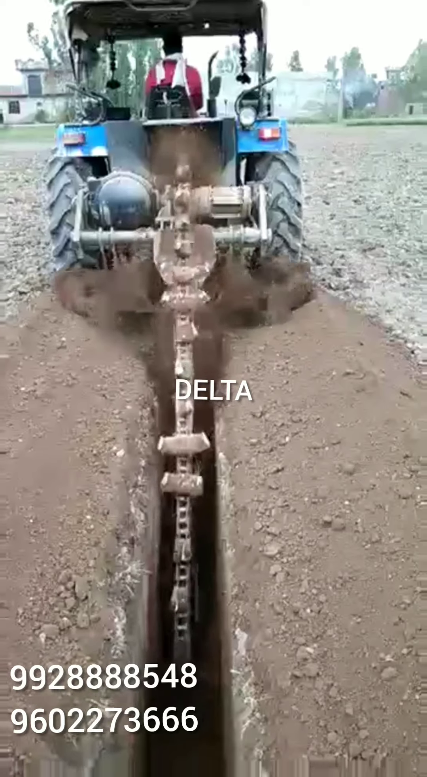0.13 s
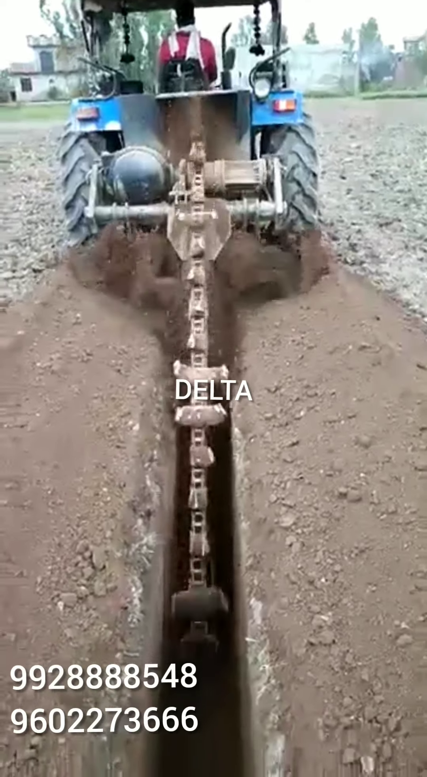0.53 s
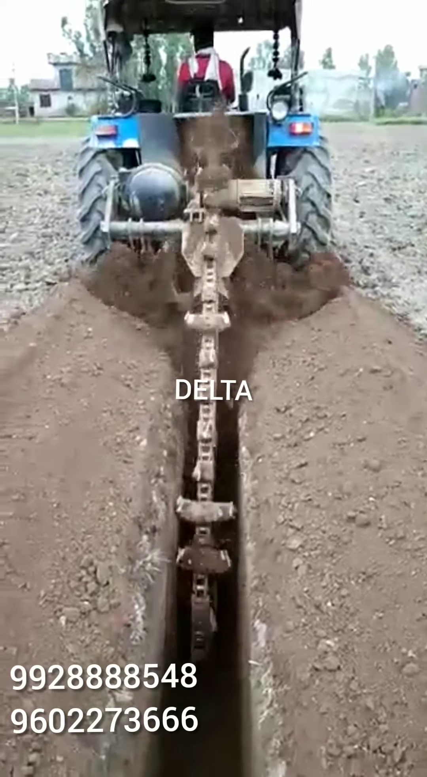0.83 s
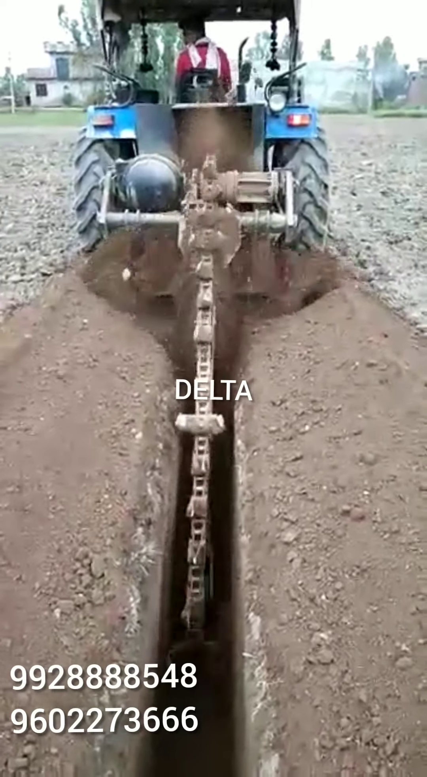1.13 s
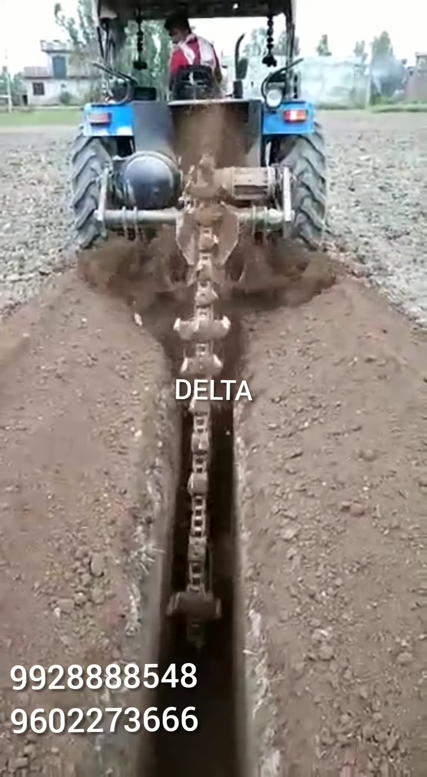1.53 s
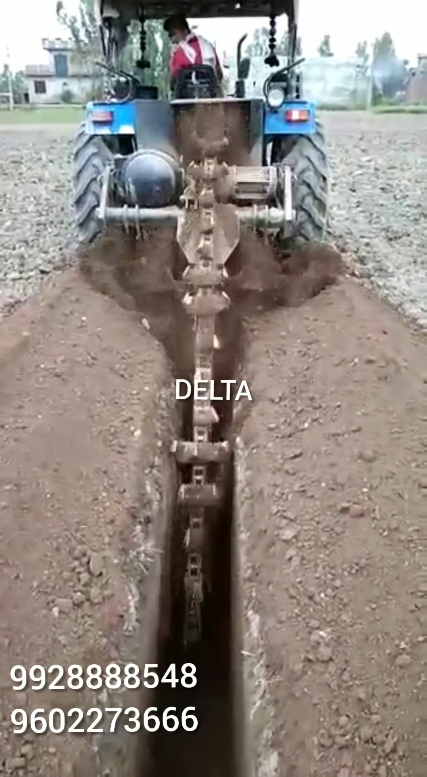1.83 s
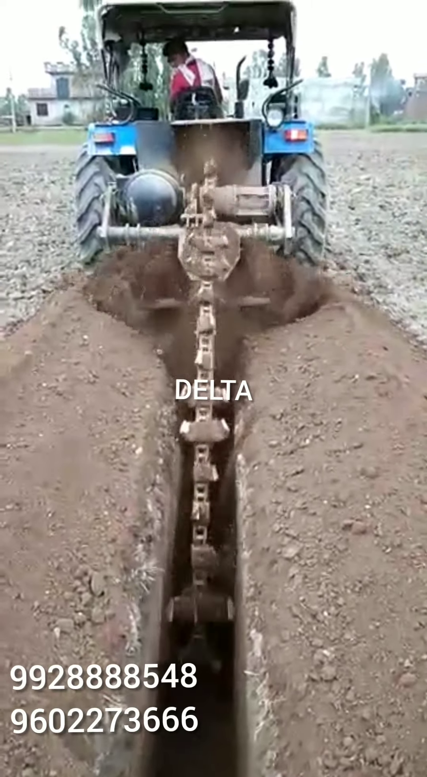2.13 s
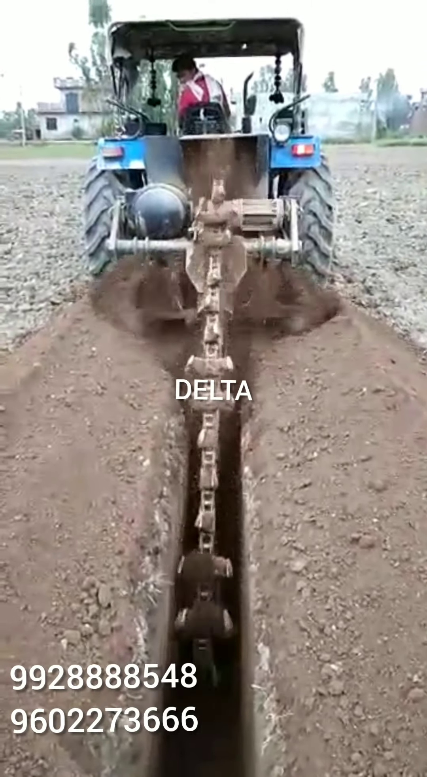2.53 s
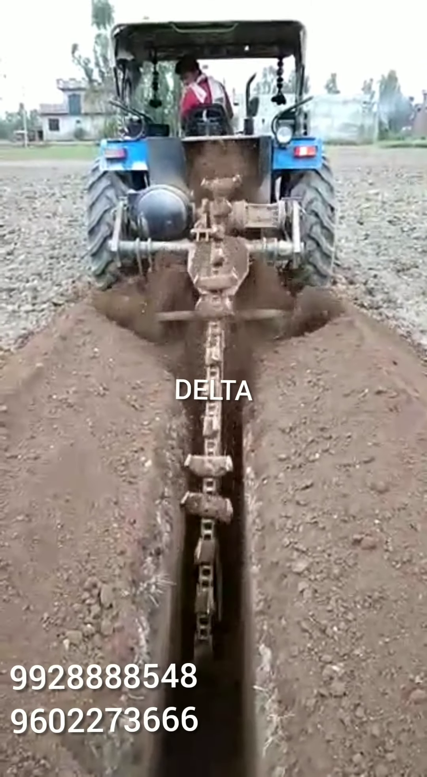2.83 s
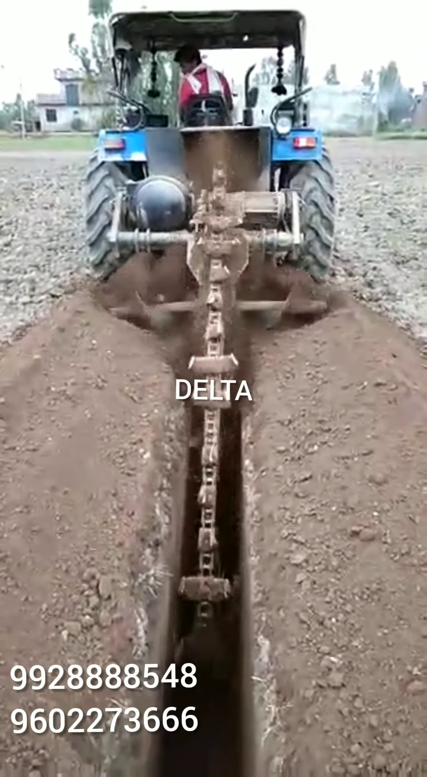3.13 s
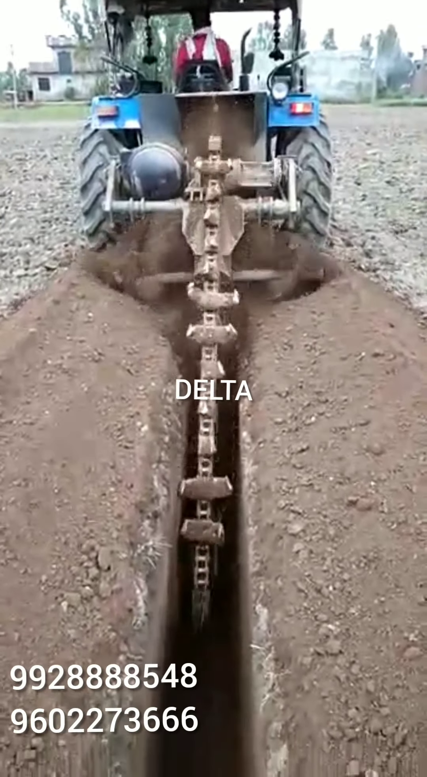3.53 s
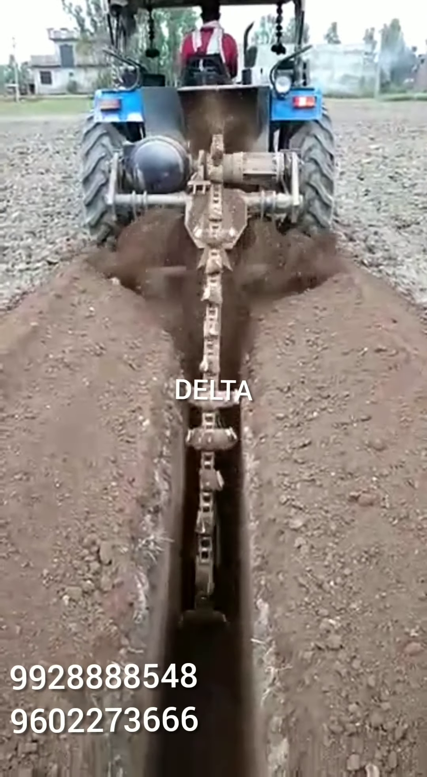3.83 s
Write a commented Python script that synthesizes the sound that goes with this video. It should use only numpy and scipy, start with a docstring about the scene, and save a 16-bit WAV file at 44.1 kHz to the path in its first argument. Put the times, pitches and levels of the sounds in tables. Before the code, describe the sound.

Chain trencher cuts in abruptly, its wavering gear drone mixed with metal chain clatter and gritty hiss.

```python
"""After 0.3 s of silence a chain trencher cuts in abruptly, a loud wavering drone over a low diesel throb.
The tractor's engine and the loaded gear drive are tuned tones, wandering in pitch and level. The chain rattles
and clatters over its sprocket and thumps along the boom: tiny random impacts through coloured filters. Dry soil
hisses as pulsed noise, stones scrape in short noise swells, links clank and jingle as decaying sine tones,
and dry pins give a few gliding squeaks."""
import sys
import numpy as np
from scipy import signal
from scipy.fft import rfft, irfft, next_fast_len
from scipy.io import wavfile
from scipy.ndimage import uniform_filter1d, minimum_filter1d, map_coordinates

SR = 44100
rng = np.random.default_rng(int(sys.argv[2]) if len(sys.argv) > 2 else 0)


def pcm_store(signal):
    """Save signal as 16-bit PCM."""
    levels = np.round(np.clip(np.atleast_2d(signal), -1, 1) * 32767)
    wavfile.write(sys.argv[1], SR, levels.astype(np.int16).T)


N = 176400  # 4 s

FIRING_HZ = 51.16  # mean firing rate of the diesel
LINK_HZ = 40.7  # links passing the sprocket
TOOTH_HZ, SPEED_SPREAD = 199.4, 0.00791  # mean gear tooth rate, relative spread of the drive's speed


def amp(db):
    """Linear gain of a level in dB."""
    return 10 ** (np.asarray(db) / 20)


def unit(x):
    """x scaled to rms 1."""
    return x / np.sqrt(np.mean(x ** 2) + 1e-20)


def clock():
    """Time of every sample in seconds."""
    return np.arange(N) / SR


def curves(rows):
    """One value per sample for each column after the time."""
    s, *cols = np.transpose(rows)
    return [np.interp(clock(), s, c) for c in cols]


def wobble(rate):
    """A smooth random curve, rate knots a second."""
    return map_coordinates(rng.standard_normal(4096), [clock() * rate + 2], mode='wrap')


def turn(hz):
    """Phase of something spinning at hz."""
    return 2 * np.pi * np.cumsum(hz * np.ones(N)) / SR


def coloured(x, points):
    """x through a causal minimum-phase filter with these (Hz, dB) points, at rms 1."""
    m = 2 * next_fast_len(N // 2 + 8192)
    f, db = np.transpose(points)
    bins = np.fft.rfftfreq(m, 1 / SR) + 1
    gain = amp(np.interp(np.log(bins), np.log(f), db))
    # folding the cepstrum onto positive times makes the filter causal
    cepstrum = irfft(np.log(gain))
    cepstrum[1:m // 2] *= 2
    cepstrum[m // 2 + 1:] = 0
    response = np.exp(rfft(cepstrum))
    return unit(irfft(rfft(x, m) * response, m)[:N])


def contacts(rate, spread_db, rub_db):
    """Tiny impacts of random size, rate a second, over smooth rubbing."""
    struck = rng.random(N) < rate / SR
    size = amp(spread_db * np.clip(rng.standard_normal(N), -2, 2))
    hits = struck * rng.choice([-1, 1], N) * size
    return unit(unit(hits) + amp(rub_db) * rng.standard_normal(N))


def beat(hz, depth_db):
    """A gain that swells once a cycle."""
    return amp(depth_db * np.cos(turn(hz)))


def strokes(hz, depth_db):
    """A gain that jumps once a cycle, by a random amount, and falls away."""
    cycle, part = np.divmod(hz * clock(), 1)
    size = rng.random(4096)[cycle.astype(int)]
    return unit(amp(depth_db * size * (1 - part) ** 2))


# Exhaust lines of the diesel. Each row: multiple of the four-stroke cycle rate, mean level in dB.
EXHAUST_LINES = [(9, -43), (10, -45.5), (12, -46.5), (13, -33.5), (15, -40.5)]


def engine():
    """The diesel's firing note and the exhaust lines of its uneven cylinders."""
    firing = turn(FIRING_HZ * (1 + 0.0043 * wobble(2.58)))
    cycle = firing / 4  # four firings to a four-stroke cycle
    note = amp(-39.5 + 0.46 * wobble(9.0)) * np.sin(firing)
    lines = np.zeros(N)
    for multiple, db in EXHAUST_LINES:
        start_phase = 2 * np.pi * rng.random()
        lines += amp(db + 0.57 * wobble(5.5)) * np.sin(multiple * cycle + start_phase)
    return np.sqrt(2) * (note + lines)


# Thumping of the boom. Each row: time in seconds, level in dB before trim and flutter.
THUMP_LEVEL = [(0.3, -22), (0.81, -21.5), (1.04, -23.5), (1.48, -23), (1.92, -24.5), (2.14, -23.5),
               (3.3, -23.5), (3.4, -24), (4.0, -24)]
# Tone of the steel boom. Each row: frequency in Hz, filter gain in relative dB.
BOOM_TONE = [(20, -11), (40, -21), (60, -10), (90, -9), (130, -3.5), (165, 2), (198, 1.5), (232, 4.5),
             (290, -1.5), (400, 3.5), (490, -2), (535, -8.5), (565, -3), (630, -14), (800, -23.5),
             (2000, -79)]


def boom():
    """The chain thumps along the steel boom, heard as dense knocks with a low body."""
    db, = curves(THUMP_LEVEL)
    level = amp(db + 1.23 + 1.13 * wobble(14))
    return level * coloured(contacts(900, 1.63, -3.4), BOOM_TONE)


# Hiss of the grit. Each row: time in seconds, level in dB before trim.
GRIT_LEVEL = [(0.3, -33.5), (0.38, -30), (0.55, -31.5), (0.58, -28), (1.36, -33.5), (1.37, -33), (1.4, -28),
              (1.41, -33.5), (2.06, -34.5), (2.09, -27.5), (2.11, -34), (3.18, -32.5), (3.23, -29.5),
              (3.42, -36.5), (3.44, -30), (3.52, -37), (3.56, -31.5), (3.87, -35.5), (3.89, -33),
              (3.91, -36), (3.96, -29), (4.0, -37)]
# Tone of the grit. Each row: frequency in Hz, filter gain in relative dB.
GRIT_TONE = [(1500, -23), (4800, -1.5), (6200, 2.5), (7000, 4), (7900, 9), (8500, 4.5), (9300, -2.5),
             (11000, -13), (13500, -23), (14700, -23), (16000, -45)]


def grit():
    """Soil hisses off the teeth as a mass of grains, pulsing at the link and firing rates."""
    db, = curves(GRIT_LEVEL)
    flutter = amp(1.86 * wobble(120))
    pulse = beat(LINK_HZ, 0.49) * beat(FIRING_HZ, 2.6) * flutter
    return amp(db + 1.1) * coloured(contacts(2500, 5.7, -1.5) * pulse, GRIT_TONE)


# Stones under the teeth. Each row: start in seconds, twice the rise time in seconds,
# band centre in Hz, gain of the swell in dB.
STONE_SCRAPES = [(0.374, .012, 6750, -30), (0.674, 0.0081, 7150, -29), (0.771, 0.0077, 6940, -24),
                 (0.813, 0.019, 2780, -24), (0.927, 0.033, 3560, -29), (1.098, 0.009, 8400, -27),
                 (1.17, 0.0069, 6900, -23), (1.397, 0.0045, 7100, -20), (1.418, .014, 8080, -26),
                 (1.447, .02, 3630, -26), (1.548, .007, 5500, -22), (1.921, .02, 3563, -39),
                 (2.419, 0.013, 7100, -22.5), (2.62, 0.0088, 6460, -27.5), (2.68, 0.021, 3310, -24),
                 (2.95, .012, 7000, -26), (3.173, 0.0064, 6000, -28), (3.199, 0.0062, 6160, -28),
                 (3.227, 0.01, 5800, -27), (3.297, 0.014, 6100, -31), (3.388, .008, 7500, -25),
                 (3.44, 0.0047, 9350, -22), (3.721, 0.0076, 3196, -23.5), (3.738, .005, 4520, -22),
                 (3.879, 0.011, 7570, -23)]


def scrapes():
    """A tooth drags over a stone: a swell of tiny slips, ringing in a band of its own."""
    out, t = np.zeros(N + SR), np.arange(SR // 5) / SR
    soft = signal.butter(4, 9500, fs=SR)  # low-pass in Hz
    for start, length, hz, db in STONE_SCRAPES:
        band = signal.iirpeak(hz, 2, fs=SR)  # Q of 2
        slips = rng.standard_normal(len(t)) * amp(2.4 * rng.standard_normal(len(t)))
        ringing = unit(signal.lfilter(*soft, signal.lfilter(*band, slips)))
        u = 2 * t / length
        swell = u * np.exp(1 - u)
        out[round(start * SR):][:len(t)] += amp(db) * swell * ringing
    return out[:N]


# Squeaks of dry pins. Each row: centre in seconds, length in seconds, pitch at the centre in Hz,
# glide in Hz per second, level in dB before the shared flutter.
PIN_SQUEAKS = [(0.759, 0.015, 8580, -3000, -22), (.773, 0.017, 8330, -4000, -15),
               (1.128, 0.021, 1620, 2, -25), (1.951, 0.018, 8790, 4991, -29.5),
               (1.949, 0.019, 4430, 2000, -26), (2.384, 0.023, 8370, -4.5, -27),
               (2.402, 0.013, 8540, 0, -24), (3.967, 0.029, 8320, -1, -20.5)]


def squeaks():
    """A dry pin sticks and slips: a thin, unsteady whistle."""
    out = np.zeros(N)
    jitter_hz, grip = 50 * wobble(400), amp(2 * wobble(250))
    for centre, length, hz, glide, db in PIN_SQUEAKS:
        t = clock() - centre
        swell = np.exp(-(2 * t / length) ** 4)
        out += amp(db) * swell * np.sin(turn(hz + glide * t + jitter_hz))
    return np.sqrt(2) * grip * out


# Loose links. Each entry: middle of the range of pitches at which a link rings, in Hz.
LOOSE_LINK_HZ = [1097, 1345, 1603, 2104, 2635, 3333, 3596]


def jingle():
    """Loose links touch at random, each ringing for a moment at a pitch of its own."""
    touches_per_s, level_db, t60_s = 110, -34.5, 0.074
    t, out = np.arange(SR // 10) / SR, np.zeros(N + SR)
    for when, pick, size, detune in rng.random((int(touches_per_s * N / SR), 4)):
        hz = LOOSE_LINK_HZ[int(pick * len(LOOSE_LINK_HZ))] * (1 + 0.094 * (detune - 0.5))
        ring = amp(5.9 * size - 60 * t / t60_s) * np.sin(2 * np.pi * hz * t)
        out[int(when * N):][:len(t)] += ring
    return amp(level_db) * unit(out[:N])


# Chain clanks. Each row: start in seconds, strike gain in dB, base ring pitch in Hz,
# gain of the noise crack in dB relative to the strike.
CHAIN_CLANKS = [(1.565, -20.5, 1648, -13), (1.688, -26, 3330, -12), (2.159, -25, 1393, 4),
                (2.229, -29, 2080, 0), (2.327, -25, 1178, -12), (3.177, -25, 1750, -11),
                (3.2002, -18.5, 1665, 5), (3.226, -22, 3412, -4), (3.557, -16, 2620, 5),
                (3.669, -21.5, 3585, -10)]
# Ring of a link. Each row: ratio to the base pitch, gain in dB relative to the strike, T60 in seconds.
LINK_RING = [(1, 8, .028), (1.32, 6, 0.017), (1.93, -2, 0.026), (2.8, -7, 0.018)]


def clanks():
    """A slack link slams home: decaying modes ring under a short crack of noise."""
    out, t = np.zeros(N + SR), np.arange(SR // 5) / SR
    dull = signal.butter(2, 5000, fs=SR)  # low-pass in Hz
    attack = 1 - np.exp(-t / 0.00068)
    for start, db, hz, crack_db in CHAIN_CLANKS:
        ring = np.zeros(len(t))
        for ratio, mode_db, t60_s in LINK_RING:
            decay = amp(mode_db - 60 * t / t60_s)
            ring += decay * np.sin(2 * np.pi * (hz * ratio * t + rng.random()))
        noise = signal.lfilter(*dull, rng.standard_normal(len(t)))
        crack = amp(crack_db - 60 * t / 0.03) * noise  # T60 of 30 ms
        out[round(start * SR):][:len(t)] += amp(db) * (ring + crack) * attack
    return out[:N]


# Rattle of the rollers. Each row: time in seconds, level in dB.
RATTLE_LEVEL = [(0.3, -31.5), (0.36, -24.5), (0.48, -29.5), (0.59, -24.5), (0.63, -30.5), (0.68, -25),
                (0.83, -25), (0.88, -33.5), (0.94, -23), (0.97, -30.5), (1.11, -24.5), (1.14, -27),
                (1.42, -29.5), (1.45, -25.5), (1.58, -24.5), (1.6, -29.5), (1.65, -23), (1.73, -29.5),
                (1.98, -28), (2.0, -19.5), (2.04, -33), (2.09, -23.5), (2.29, -29.5), (2.33, -24),
                (2.35, -31), (2.37, -27), (2.54, -28.5), (2.57, -22), (2.62, -31), (2.67, -27),
                (3.18, -29.5), (3.21, -27), (3.22, -29.5), (3.31, -24), (3.52, -36.5), (3.56, -25.5),
                (3.71, -35), (3.73, -24), (3.82, -27.5), (3.83, -33.5), (3.95, -23), (3.97, -27),
                (4.0, -28)]
# Tone of the rattle. Each row: frequency in Hz, filter gain in relative dB.
RATTLE_TONE = [(200, -28), (600, -12), (710, -8), (775, 2.5), (870, -1.5), (960, 0), (1300, 0.5),
               (1600, 0.5), (1820, -9.5), (2120, -6), (2500, -10), (4000, -9.5), (9000, -96.5)]
# Clatter of the links. Each row: time in seconds, level in dB before trim.
CLATTER_LEVEL = [(0.3, -32), (0.33, -19), (0.34, -28), (0.67, -27), (0.69, -22.5), (0.77, -37), (0.81, -32),
                 (0.9, -28.5), (0.94, -26), (1.05, -30.5), (1.68, -29), (1.78, -35), (1.8, -29.5),
                 (2.01, -29.5), (2.05, -34), (2.09, -22.5), (2.13, -29.5), (2.98, -26), (3.02, -32),
                 (3.04, -25.5), (3.2, -31), (3.21, -26), (3.38, -27.5), (3.42, -40), (3.44, -29),
                 (3.55, -31.5), (3.57, -26), (3.75, -28.5), (3.85, -32.5), (3.87, -24.5), (4.0, -27)]
# Tone of the clatter. Each row: frequency in Hz, filter gain in relative dB.
CLATTER_TONE = [(600, -19), (1800, -8), (2500, -1.5), (2900, -4), (3400, 2), (4400, -1.5), (5100, -11.5),
                (7000, -20.5), (14000, -43)]


def chain():
    """Rollers rattle at the tooth rate, links clatter above; both jolt at the link and firing rates."""
    rattle_db, = curves(RATTLE_LEVEL)
    clatter_db, = curves(CLATTER_LEVEL)
    teeth = beat(TOOTH_HZ * (1 + SPEED_SPREAD * wobble(21.497)), 1.0)
    jolt = strokes(LINK_HZ, 4.3) * strokes(FIRING_HZ, 2.6)
    rattle = coloured(contacts(1500, 3.2, -0.5) * teeth * jolt, RATTLE_TONE)
    clatter = coloured(contacts(900, 5.0, 0.2) * jolt, CLATTER_TONE)
    return amp(rattle_db) * rattle + amp(clatter_db - 2.46) * clatter


# Drone of the gear drive. Each row: time in seconds, pitch in Hz, level in dB.
GEAR_DRONE = [(0.3, 215, -31.0), (0.36, 202, -21), (0.39, 184.4, -21.5), (0.48, 186.6, -14),
              (0.5, 192, -33), (0.54, 196.6, -12), (0.58, 190.6, -29), (0.61, 195, -12.5),
              (0.66, 192.2, -21.0), (0.68, 209, -24.5), (0.72, 200.5, -29), (0.81, 187, -23),
              (0.83, 204.8, -21), (0.87, 198.8, -14.5), (0.94, 204, -29), (1.0, 186.2, -24),
              (1.03, 204, -21), (1.08, 198.3, -15), (1.12, 180.7, -25), (1.21, 193.4, -12),
              (1.24, 201, -22), (1.3, 185, -17.5), (1.43, 207.3, -22.5), (1.47, 190.4, -20.5),
              (1.56, 193.7, -26), (1.59, 194.1, -13.5), (1.67, 201, -28), (1.71, 194.7, -22),
              (1.78, 202.5, -16), (1.81, 187.7, -24.5), (1.84, 187.3, -16.5), (1.86, 189.4, -28),
              (1.96, 199.8, -14), (2.17, 190.9, -30.5), (2.2, 189.2, -17), (2.25, 202.2, -38),
              (2.27, 198.1, -18), (2.42, 189.1, -20.5), (2.45, 203.3, -19), (2.62, 191, -22),
              (2.72, 202.2, -27.5), (2.77, 202.4, -16), (2.83, 192, -31), (2.87, 204, -28), (2.9, 188, -33),
              (2.92, 198, -19), (2.98, 192.1, -30), (3.02, 194, -11.5), (3.07, 193.4, -40),
              (3.12, 203, -19), (3.24, 188, -21.5), (3.26, 213.3, -30), (3.31, 214.7, -17.5),
              (3.34, 188.7, -31), (3.4, 194.2, -10), (3.44, 204.1, -22), (3.6, 186, -21.0),
              (3.68, 205, -22), (3.74, 188, -21.5), (3.78, 202.4, -24.5), (3.81, 189, -20),
              (3.86, 202.1, -17.5), (3.95, 194.4, -26.5), (3.99, 195.3, -18)]
# Whines of the drive. Each row: mean pitch in Hz, usual level in dB.
GEAR_WHINES = [(382.5, -30), (560, -36.5), (776, -44), (965, -41), (1151, -41), (1338, -46.5), (1540, -54),
               (2112, -57)]
# Swell of all the whines. Each row: time in seconds, gain over their usual level in dB.
WHINE_SWELL = [(.3, 2.5), (.8, 3.5), (1.0, -3), (1.5, 1.5), (1.85, 0), (2.25, 1.5), (3.0, -5), (3.4, 0),
               (3.95, 3)]


def gears():
    """The drive drones, its pitch and level wavering quickly like close tones beating; whines come and go."""
    hz, db = curves(GEAR_DRONE)
    drone = amp(db) * np.sin(turn(hz))
    speed = 1 + SPEED_SPREAD * wobble(22)  # shared by all the whines
    whine = np.zeros(N)
    for whine_hz, whine_db in GEAR_WHINES:
        level = amp(whine_db + 3.95 * wobble(17))
        whine += level * np.sin(turn(whine_hz * speed) + 0.99 * wobble(40))
    swell_db, = curves(WHINE_SWELL)
    return np.sqrt(2) * (drone + amp(swell_db) * whine)


def scene():
    """All layers summed, the same in both channels."""
    machine = engine() + boom() + chain() + gears()
    soil = grit() + scrapes()
    loose_metal = squeaks() + jingle() + clanks()
    mono = machine + soil + loose_metal
    return np.array([mono, mono])


def record(dry):
    """The sound cuts in and settles; a limiter holds the peaks down; nothing passes above the band limit."""
    start_s, rise_s, start_db = 0.2985, 0.086, -6  # a little low at first
    limit_db, hold_s, top_hz = -7.5, 0.015, 15700
    t = clock() - start_s
    x = dry * (t > 0) * amp(start_db * np.clip(1 - t / rise_s, 0, 1))
    hold = int(hold_s * SR)
    needed = np.minimum(1, amp(limit_db) / (np.abs(x).max(axis=0) + 1e-9))
    # hold the lowest gain nearby, then smooth it
    x = x * uniform_filter1d(minimum_filter1d(needed, hold), 2 * hold)
    m = next_fast_len(N + 8192)
    edge = np.clip((top_hz - np.fft.rfftfreq(m, 1 / SR)) / 400, 0, 1)  # fades over the last 400 Hz
    return irfft(rfft(x, m) * edge, m)[:, :N]


dry = scene()
out = record(dry)
pcm_store(out)
```